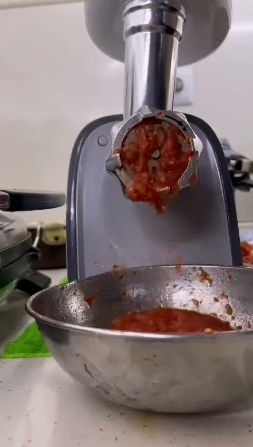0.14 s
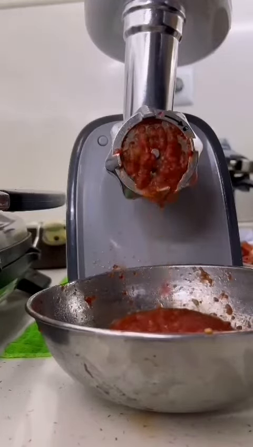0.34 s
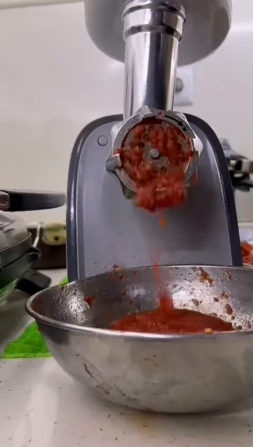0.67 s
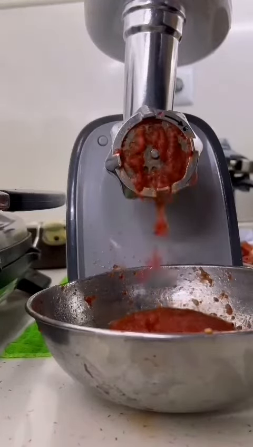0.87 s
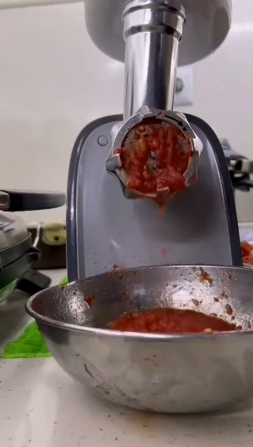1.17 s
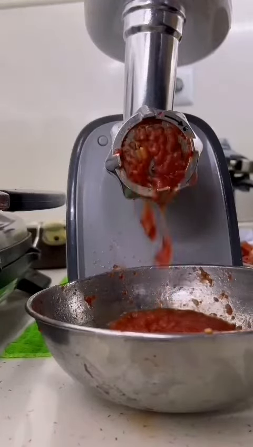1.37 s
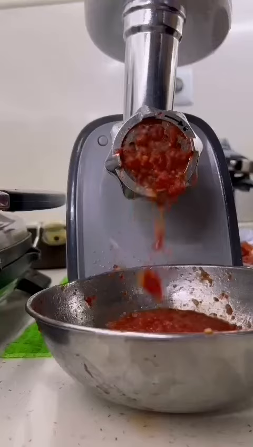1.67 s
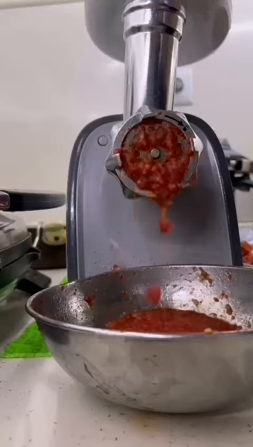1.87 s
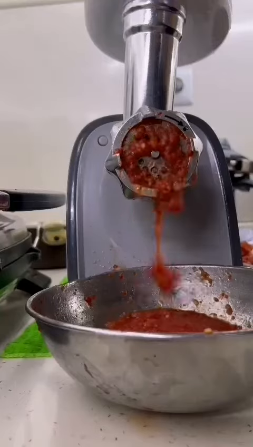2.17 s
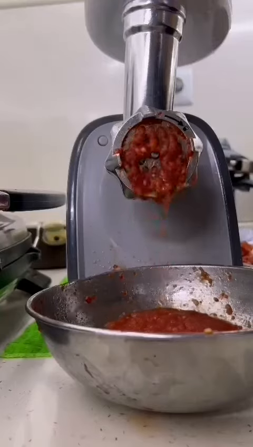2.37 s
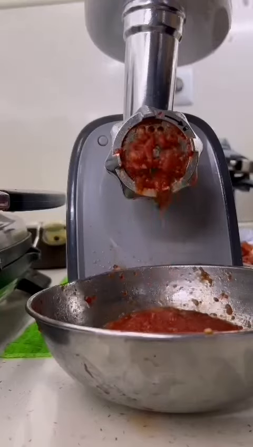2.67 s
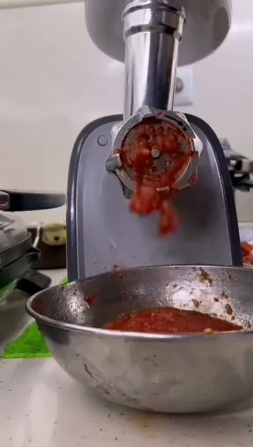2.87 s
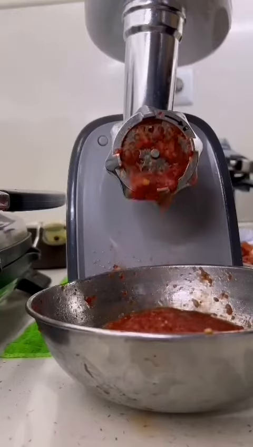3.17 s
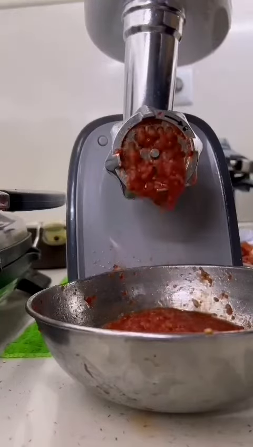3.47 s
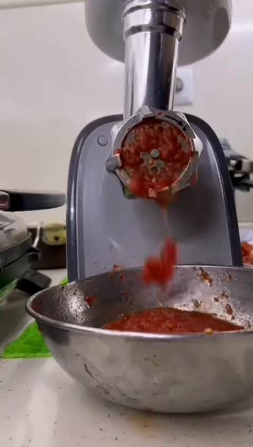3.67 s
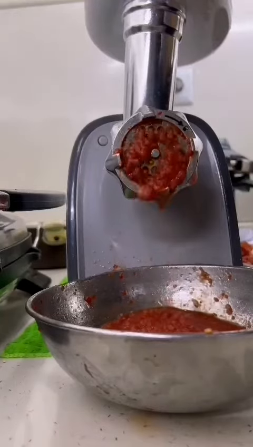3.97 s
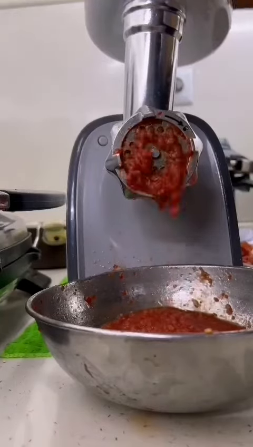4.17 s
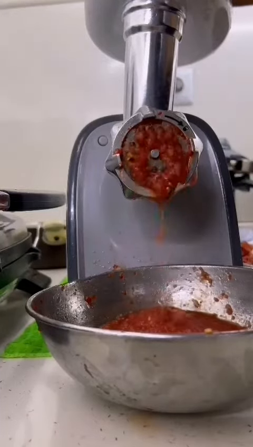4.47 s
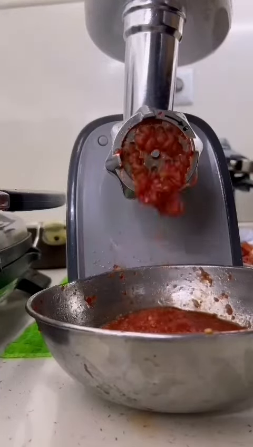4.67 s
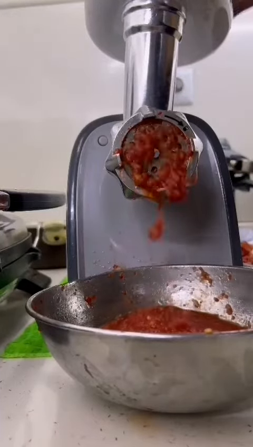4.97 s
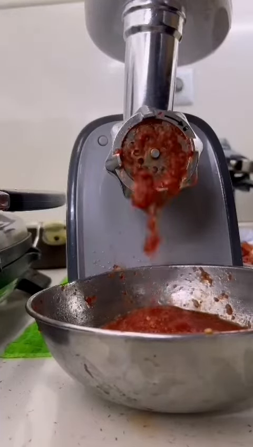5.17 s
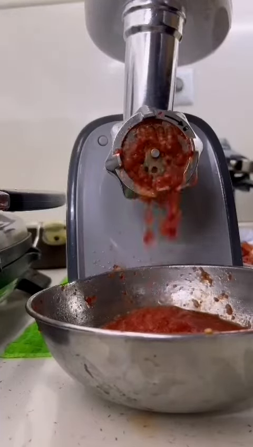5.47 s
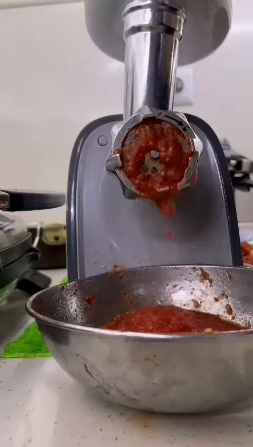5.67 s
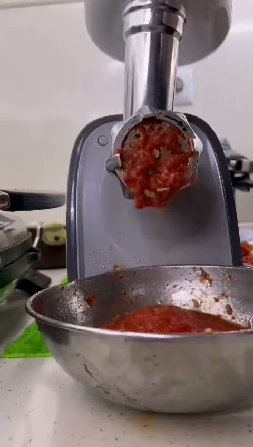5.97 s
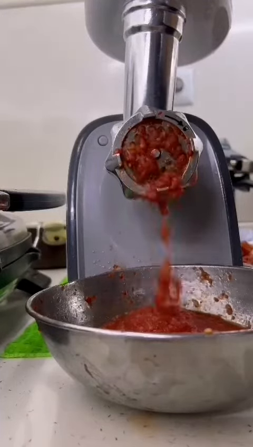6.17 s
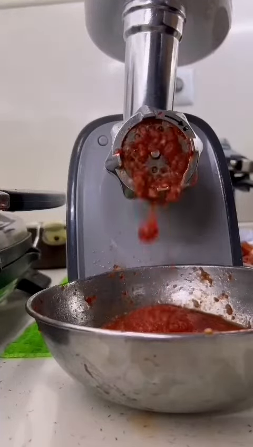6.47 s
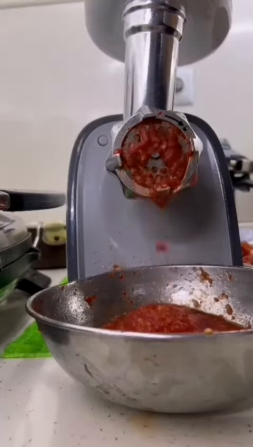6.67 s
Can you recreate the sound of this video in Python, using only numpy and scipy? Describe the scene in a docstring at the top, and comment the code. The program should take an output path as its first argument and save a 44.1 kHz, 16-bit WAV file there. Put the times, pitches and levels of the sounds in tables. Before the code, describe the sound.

An electric meat grinder runs with a steady motor hum and fast, hollow gear knocking, swelling slightly as it pushes soft food.

```python
"""A steady hum and a fast, hollow knocking: an electric meat grinder at work on a kitchen counter.
The unbalanced rotor hums and whines, driving the auger through three gear pairs. The middle pair taps,
knocks and rattles in the gearbox, harder each time the auger squeezes the food. Behind it, bearing and
brush noise rings the housing, cooling air rushes, and two lumps of pulp thud softly into a bowl.
Each resonance reaches the two microphone ports with its own level and lag."""
import sys
import numpy as np
from scipy import signal
from scipy.fft import rfft, irfft, next_fast_len
from scipy.io import wavfile
from scipy.ndimage import uniform_filter1d, map_coordinates

SR = 44100
rng = np.random.default_rng(int(sys.argv[2]) if len(sys.argv) > 2 else 0)


def unload_wav(signal):
    """Save mono or channel-first audio to the path in sys.argv[1] as 16-bit WAV at rate SR, clipped to [-1, 1]."""
    wavfile.write(
        sys.argv[1],
        SR,
        np.round(np.clip(np.atleast_2d(signal).T, -1, 1) * 32767).astype(np.int16),
    )


N = 301203
TIME = np.arange(N) / SR
FFT_SIZE = next_fast_len(N + SR // 4)
FREQS = np.fft.rfftfreq(FFT_SIZE, 1 / SR)


def amp(db):
    """dB to gain."""
    return 10 ** (np.asarray(db) / 20)


def automation(rows):
    """One curve for each column after the time."""
    seconds, *columns = np.transpose(rows)
    return [np.interp(TIME, seconds, column) for column in columns]


def spectral_curve(points):
    """Join (Hz, value) points on a log frequency axis."""
    hz, values = np.transpose(points)
    return np.interp(np.log(FREQS + 1), np.log(hz + 1), values)


def wobble(rate):
    """A smooth random curve, rate knots a second."""
    return map_coordinates(rng.standard_normal(int(N * rate / SR) + 4), [TIME * rate])


def hiss():
    """Spectrum of white noise with power 1 per Hz."""
    spectrum = rng.standard_normal(len(FREQS)) + 1j * rng.standard_normal(len(FREQS))
    return spectrum * np.sqrt(FFT_SIZE * SR) / 2


def to_sound(spectrum):
    """Stereo spectrum to samples."""
    return irfft(spectrum, FFT_SIZE)[:, :N]


def mode(hz, width_hz):
    """A resonance of gain 1 at its centre, taken twice for steep skirts."""
    damping = 1j * FREQS * width_hz
    return (damping / (hz * hz - FREQS ** 2 + damping)) ** 2


def ports(left_db, right_db, lead):
    """Stereo placement as complex gains; the left port leads by lead radians."""
    return (amp([left_db, right_db]) * np.exp(.5j * lead * np.array([1, -1])))[:, None]


def tone(cycles, gains, waver_db, waver_rad):
    """A tone with rms set by gains, wavering in level and phase."""
    waver = amp(waver_db * wobble(14)) * np.exp(1j * waver_rad * wobble(8))
    return np.sqrt(2) * np.real(gains * waver * np.exp(2j * np.pi * cycles))


def add_flutter(sound, at_hz, depth_db):
    """An effect like audio compression: random patches of gain over time and frequency."""
    hz, _, frames = signal.stft(sound, SR, nperseg=512)
    patches = uniform_filter1d(rng.standard_normal(frames.shape[1:]), size=8, axis=0)
    patches = uniform_filter1d(patches, size=7, axis=1)
    gain_db = np.interp(hz, at_hz, depth_db)[:, None] * patches / patches.std()
    return signal.istft(frames * amp(gain_db), SR, nperseg=512)[1][:, :N]


# The motor's drift. Each row: time in seconds, rotor speed in Hz, base level of the hum in dB.
ROTOR_DRIFT = [(0.0, 307.8, -40.1), (0.8, 308.02, -39.8), (1.2, 307.9, -39.2), (1.7, 307.76, -40.0),
               (2.2, 308.12, -41.1), (2.7, 308.54, -38.5), (3.3, 308.44, -38.4), (3.8, 308.17, -38.2),
               (4.35, 308.1, -38.5), (4.6, 307.84, -40.0), (5.0, 307.47, -38.9), (5.25, 307.4, -39.7),
               (6.0, 308.19, -40.3), (6.25, 308.46, -38.6), (6.55, 308.68, -38.4), (6.83, 308.65, -38.3)]
# The gear pairs, motor to auger. Each row: pinion teeth, wheel teeth.
GEAR_PAIRS = [(9, 74), (19, 41), (9, 38)]
def shaft_turns():
    """Turns made so far by the rotor, both lay shafts and the auger, each geared down from the last."""
    rotor = np.cumsum(automation(ROTOR_DRIFT)[0]) / SR
    ratios = np.cumprod([1] + [pinion / wheel for pinion, wheel in GEAR_PAIRS])
    return rotor * ratios[:, None]


# The grinding rhythm. Each row: centre of a push in seconds, rise of the surge in dB.
AUGER_PUSHES = [(.03, 6), (.25, 6), (.52, 4.5), (.76, 5), (.98, 5.5), (1.24, 5.5), (1.53, 4), (1.75, 4),
                (2.04, 3), (2.22, 5.5), (2.49, 4.5), (2.73, 4), (2.97, 5.5), (3.19, 4.5), (3.45, 6),
                (3.69, 4.5), (3.93, 5.5), (4.17, 5), (4.41, 5.5), (4.67, 7.5), (4.89, 7), (5.15, 6.5),
                (5.4, 8.5), (5.61, 6.5), (5.87, 4.5), (6.1, 6.5), (6.36, 3.5), (6.6, 4), (6.81, 6)]
def surge(rest_db=-3, half_length_s=.05):
    """Each auger turn squeezes the food: a swell in dB that layers follow by their own amounts."""
    return rest_db + sum(db * np.exp(-.5 * ((TIME - s) / half_length_s) ** 2) for s, db in AUGER_PUSHES)


# The colour of the fan rush. Each row: frequency in Hz, level in dB per Hz.
AIR_COLOUR = [(20, -104), (60, -96), (120, -89), (380, -89), (950, -83), (990, -86), (1150, -80),
              (1300, -82), (1650, -84), (2020, -86), (2180, -79), (2510, -79), (2575, -90), (2640, -78),
              (3030, -80), (3130, -88), (3300, -78), (3560, -83), (3880, -85), (4250, -87.5), (4700, -89.5),
              (6000, -88), (6450, -93), (6750, -90), (7300, -95), (8100, -102), (9100, -98.5), (10200, -96),
              (10800, -100.5), (11500, -107)]
# Thin whistles on top. Each row: pitch in Hz, width in Hz, level in dB per Hz.
AIR_WHISTLES = [(6290, 100, -84), (6890, 100, -87), (7130, 120, -87), (7580, 45, -80.5), (8270, 50, -87),
                (8950, 80, -92), (9650, 60, -92), (11080, 110, -88)]
# The stereo image of the air. Each row: frequency in Hz, likeness from 0 (wide) to 1 (mono).
AIR_LIKENESS = [(200, .96), (500, .7), (900, .2), (1700, .4), (2300, .1), (3300, .3), (4100, .92),
                (4800, .2), (5400, .75), (6200, .5), (6600, .1), (11000, .1)]
def cooling_air():
    """The fan rushes and whistles, swelling slightly with each push;
    an added flutter, like audio compression, roughens the treble."""
    spread = np.arccos(np.clip(spectral_curve(AIR_LIKENESS), 0, 1)) / 2
    mid, side = hiss() * np.cos(spread), hiss() * np.sin(spread)
    whistle_power = sum(abs(amp(db) * mode(hz, width)) ** 2 for hz, width, db in AIR_WHISTLES)
    colour = np.sqrt(amp(2 * spectral_curve(AIR_COLOUR)) + whistle_power)
    rush = to_sound(colour * np.array([mid + side, mid - side]))
    return add_flutter(rush, at_hz=[3000, 6000, 7500], depth_db=[1.2, 2.1, 5]) * amp(.046 * surge())


# Pulp landing. Each row: start in seconds, level in dB before the attack rounds it off, pitch in Hz.
PULP_LANDINGS = [(4.375, -50, 85), (5.01, -51, 75)]
def pulp_thuds(attack_s=.0054, t60_s=.42):
    """Each soft lump pushes the bowl once: a short, low thud."""
    out, t = np.zeros(N), np.arange(SR // 8) / SR
    for start, db, hz in PULP_LANDINGS:
        envelope = amp(db - 60 * t / t60_s) * (1 - np.exp(-t / attack_s))
        out[round(start * SR):][:len(t)] += envelope * np.sin(2 * np.pi * hz * t)
    return out


# The ring of the panels. Each row: pitch in Hz, width in Hz, left and right level in dB per Hz,
# left lead in radians.
PANEL_MODES = [(90, 50, -81, -81, .13), (156, 32, -75.5, -75.5, 0), (235, 90, -75.5, -73.5, -.2),
               (335, 42, -68, -65.5, 0), (412, 25, -80, -71, .4), (470, 70, -76, -75, .3),
               (1020, 35, -74, -76, -1.8), (1076, 40, -71, -75, 1.5), (1260, 120, -75, -85, -.8),
               (1332, 45, -72, -71, .8), (1420, 90, -74, -79, -.3), (1530, 70, -73, -75, -.2),
               (1660, 90, -77, -78, -.1), (1770, 90, -77, -77, 0), (1920, 150, -71.5, -76, -.2),
               (2150, 130, -74.5, -82, .1), (2350, 130, -75, -78, -.9), (2500, 110, -76, -77, 2.6),
               (2630, 130, -69, -75, -2.5), (2780, 85, -69.5, -71.5, -.7), (2890, 80, -82, -76, -1.7),
               (2990, 110, -73, -76, 2.5), (3085, 60, -77, -77, -1.6), (3210, 120, -77, -75, -1),
               (3570, 150, -84, -82, -.2), (3740, 130, -79, -79, 0), (3980, 120, -84, -84, 0),
               (4560, 120, -89, -89, 0), (5040, 300, -87, -94, -.7)]
def housing_ring(turns):
    """Bearing and brush noise rings the panels; the mids rasp once and thrice a lay shaft turn."""
    panels = sum(hiss() * mode(hz, width) * ports(*place) for hz, width, *place in PANEL_MODES)
    mids = (FREQS > 950) & (FREQS < 2300)
    rasp_db = .9 * np.cos(2 * np.pi * (turns[1] - .24)) + .6 * np.cos(2 * np.pi * (3 * turns[1] - .2))
    ring = to_sound(panels * ~mids) + amp(rasp_db) * to_sound(panels * mids)
    return add_flutter(ring, at_hz=[400, 1000, 4000], depth_db=[.3, 1.1, 1.5]) * amp(.22 * wobble(3.77))


# The whine. Each row: multiple of the rotor speed, left and right base level in dB, left lead in radians.
WHINE_PARTIALS = [(2, -55, -55, 1.4), (3, -58, -63, 2.5), (4, -62, -70, -.7), (5, -67, -68, -.2),
                  (6, -62, -63, .2), (7, -63, -68, .3), (8, -61, -64, 1.5), (9, -55, -57, -1.4),
                  (10, -64, -65, -1.6)]
# The whine's own swells and fades. Each row: time in seconds, swell in dB.
WHINE_SWELLS = [(0, 0), (.2, 1.5), (.45, 0.5), (1.0, 3), (1.2, -5), (1.45, 2), (1.95, -3), (2.2, 2),
                (2.4, -1), (2.7, 1.5), (3.1, 1), (3.55, 0.5), (3.8, 1.5), (4.1, -1), (4.55, -3), (4.9, -4),
                (5.3, -5), (5.7, 2), (6.0, -3), (6.2, 1.5), (6.6, -7), (6.83, 2)]
def motor(turns, sag_per_db=.096):
    """Rotor unbalance gives a strong hum that sags under each push; its overtones are weak and unsteady."""
    rotor, surge_db = turns[0], surge()
    hum_db = automation(ROTOR_DRIFT)[1] - sag_per_db * (surge_db - surge_db.mean())
    hum = tone(rotor, ports(.066, 3.8, 0), waver_db=.68, waver_rad=.015)
    whine_db = automation(WHINE_SWELLS)[0] + 1
    whine = sum(tone(multiple * rotor, ports(*place), waver_db=3, waver_rad=.32)
                for multiple, *place in WHINE_PARTIALS)
    return amp(hum_db) * hum + amp(whine_db) * whine


# The gear tones. Each row: lay shaft 1 or 2, multiple of its speed, left and right level in dB,
# left lead in radians.
GEAR_PARTIALS = [(1, 1, -80, -80, 0), (1, 4, -71, -71, 0), (1, 38, -55, -65, -.3), (2, 9, -66, -66, 0)]
def gear_tones(turns):
    """Meshing teeth and wheels running out of true sing faint tones locked to their shafts."""
    return sum(tone(multiple * turns[round(shaft)], ports(*place), waver_db=1, waver_rad=.17)
               for shaft, multiple, *place in GEAR_PARTIALS)


def strikes(count):
    """A unit pulse each time the count passes a whole number."""
    return np.diff(np.floor(count), prepend=np.floor(count[0]))


# The hollow body of the gearbox. Each row: pitch in Hz, width in Hz, left and right gain in dB,
# left lead in radians.
GEARBOX_MODES = [(559, 58, -13, -6, 1.43), (596, 45.6, -4, -8, 0.63), (638.6, 34.5, -1, -6.5, 1.4),
                 (661, 30, -6, -16, 3), (696.7, 29, -7.5, -11, 1), (728.3, 60.7, 1.5, -2, -0.95),
                 (755.3, 36.6, 3.5, -6, 0.5), (784.8, 37, -6, 0.5, -1.5), (824, 52, -22, -6, -2),
                 (906, 41, -5, -4.5, 0.57)]
# Accents of the high tooth, mostly near the top of a push. Each row: time in seconds, boost or cut in dB.
KNOCK_ACCENTS = [(.03, 2.5), (.519, 4), (.946, 6), (1.052, 5), (1.24, 1), (2.2, 0), (2.733, 2.5),
                 (2.84, 10.5), (2.973, 3.5), (3.187, 2), (3.692, 2), (3.932, 5), (4.172, -1), (4.413, 5),
                 (4.673, -4), (4.921, -5), (5.028, 9), (5.134, 6), (5.161, 5.5), (5.375, -6), (5.429, 6),
                 (5.617, 1), (5.856, 4), (6.097, 4), (6.575, 4), (6.763, 4.5), (6.816, 1)]
def gearbox(turns, twist_teeth_per_db=.025, twist_lag_s=.03):
    """The middle pair's teeth tap, one high tooth knocks, loose play rattles: all ring the same modes."""
    surge_db = surge()
    lay = turns[1] - .2  # turns counted from the high tooth
    runout = np.cos(2 * np.pi * (turns[2] - .4))  # the second wheel runs out of true
    twist = twist_teeth_per_db * np.interp(TIME - twist_lag_s, TIME, surge_db)  # load winds up the mesh
    tap_db = -9 + 2.1 * runout + 1.7 * surge_db + .5 * wobble(12)
    taps = amp(tap_db) * strikes(lay * GEAR_PAIRS[1][0] + twist)
    accent_db = sum(db * (abs(TIME - s) < .013) for s, db in KNOCK_ACCENTS)  # within half a turn
    knock_db = 9 + 1.8 * runout + .4 * surge_db + accent_db + 1.7 * wobble(37)
    knocks = amp(knock_db) * strikes(lay)
    modes = [mode(hz, width) * ports(*place) for hz, width, *place in GEARBOX_MODES]
    hits = to_sound(rfft(taps + knocks, FFT_SIZE) * sum(modes))
    rattle = to_sound(sum(hiss() * resonance for resonance in modes))
    after_knock = np.cos(2 * np.pi * (lay - .15))
    rattle_db = -64.4 + .8 * surge_db + 1.2 * runout + 1.8 * after_knock
    return hits + amp(rattle_db) * rattle


def scene():
    """The whole grinder in stereo, on one set of turning shafts."""
    turns = shaft_turns()
    drive = motor(turns) + gearbox(turns) + gear_tones(turns)
    return drive + housing_ring(turns) + cooling_air() + pulp_thuds()


def record(dry, top_hz=11530):
    """A brick-wall low-pass takes off the top."""
    return to_sound(rfft(dry, FFT_SIZE) * (FREQS < top_hz))


dry = scene()
out = record(dry)
unload_wav(out)
```